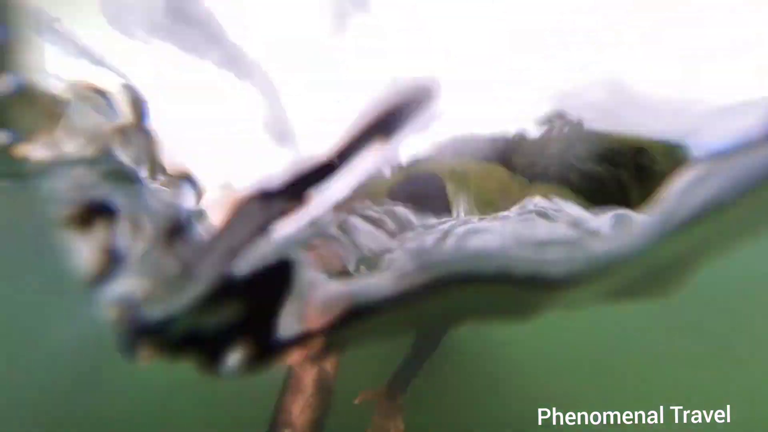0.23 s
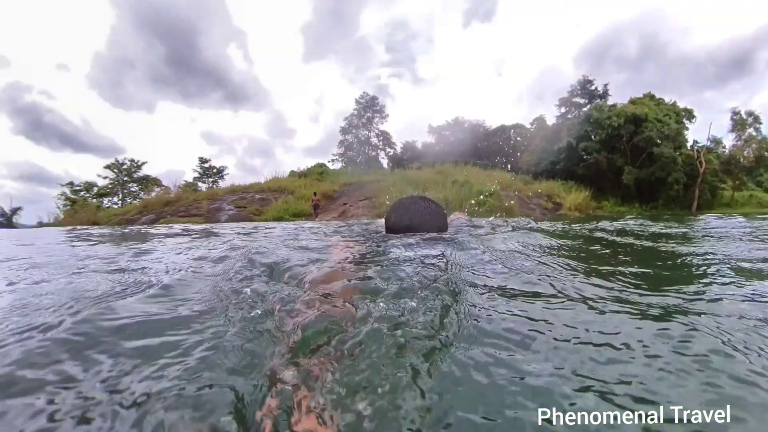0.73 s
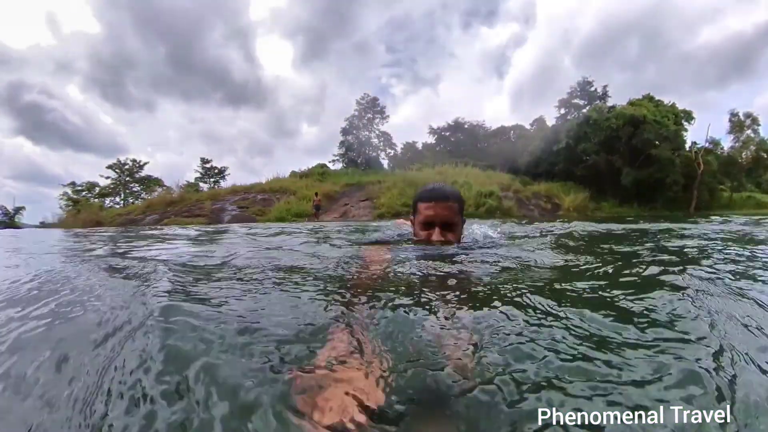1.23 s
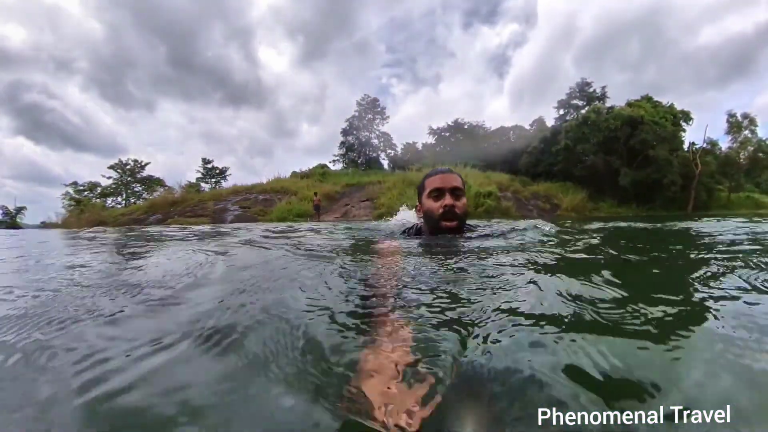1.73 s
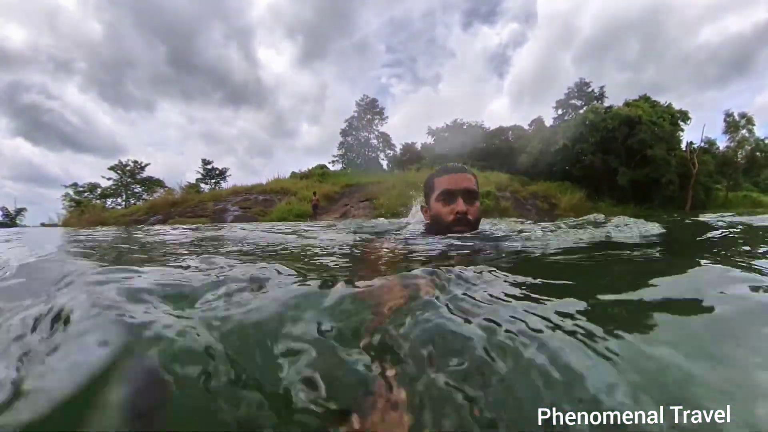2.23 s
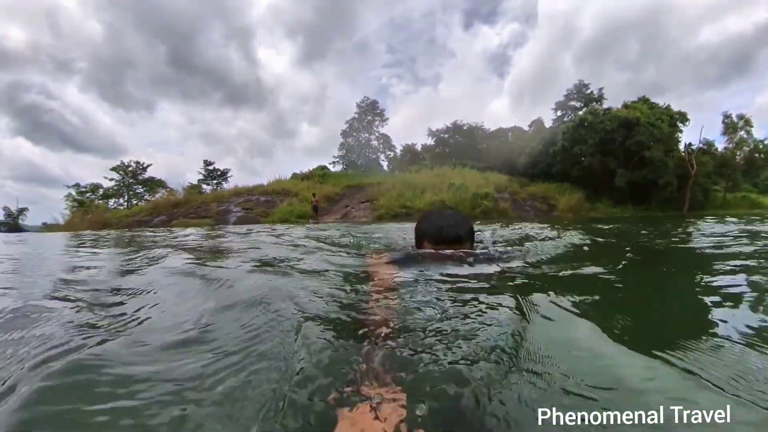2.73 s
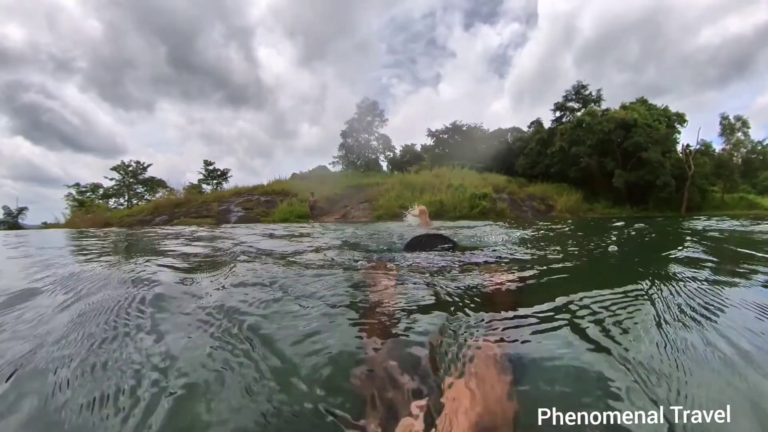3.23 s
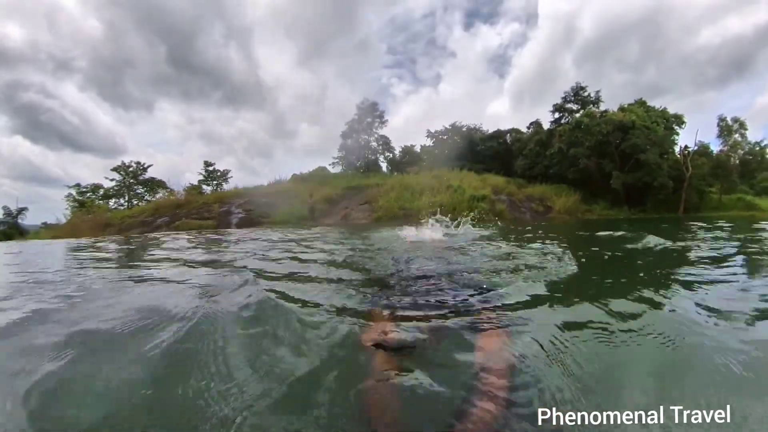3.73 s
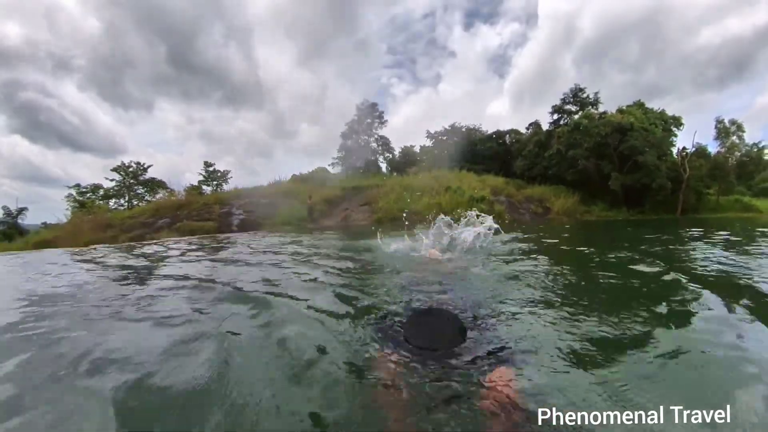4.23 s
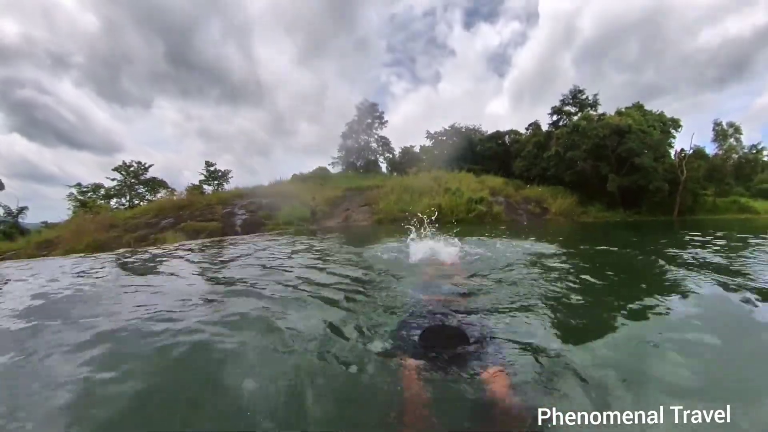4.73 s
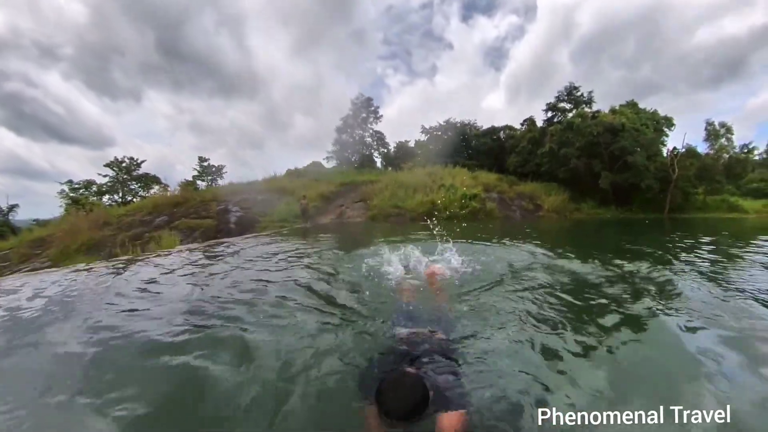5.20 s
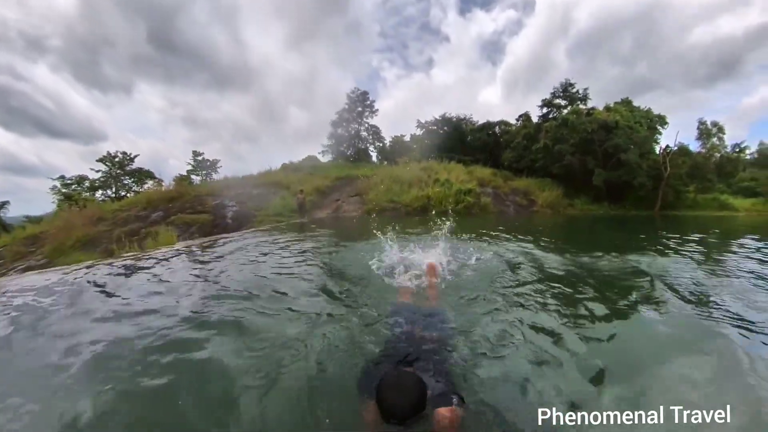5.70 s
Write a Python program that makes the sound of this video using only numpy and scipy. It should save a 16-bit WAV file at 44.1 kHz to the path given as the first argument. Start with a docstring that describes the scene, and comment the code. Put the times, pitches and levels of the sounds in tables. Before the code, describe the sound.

Close, muffled mono sound of paddling in open water, captured inside a waterproof casing. Heavy low knocks come first, then uneven gurgling, rounded plops and short high drips through a calmer middle. A wet sizzle bursts over the microphone at nearly four seconds and snaps loudly. Afterwards deep booming gurgles continue, and the last moments bring rapid lumpy kicks with faint puffs of spray over steady soft hiss.

```python
"""Paddling in a lake, heard from inside a wet housing

A swimmer paddles around a waterproof housing held at the lake surface; everything is muffled.
Air pockets thump and plop as decaying sines; waves and kicks shape noise and bubble swarms into churning.
Drops tick and drip as short high rings, and spray is coloured noise with tiny drips.
Once, random grains fizz through the resonances of the microphone port; a dull noise hiss lies under it all."""
import sys
import numpy as np
from scipy import signal
from scipy.fft import rfft, irfft, next_fast_len
from scipy.io import wavfile
from scipy.ndimage import uniform_filter1d

SR = 44100
rng = np.random.default_rng(int(sys.argv[2]) if len(sys.argv) > 2 else 0)


def digitize_waveform(pressure):
    """Quantize a signal to 16-bit integers and store it at the path in sys.argv[1].

    Rows of a 2-D input are taken as channels; values are limited to [-1, 1].
    """
    field = np.atleast_2d(pressure).T
    bounded = np.clip(field, -1, 1)
    quanta = np.round(bounded * 32767).astype(np.int16)
    wavfile.write(sys.argv[1], SR, quanta)


N = 262836
TIME = np.arange(N) / SR

# Levels in dB are relative within each table; the functions below set the final gains.

# Spectra of the dull hiss and of its upper skirt. Each row: frequency in Hz, relative level in dB.
HISS_SPECTRUM = [(170, -8), (260, -3), (400, -0.5), (560, -4), (720, -7), (950, -6.5), (1200, -5.5),
                 (1600, -6), (1850, -13.5), (2100, -18), (2600, -12.5), (3000, -19.5), (3900, -31)]
SKIRT_SPECTRUM = [(2900, -33), (3200, 3), (3600, -8.5), (4100, -23), (5000, -35)]
HISS_DB, SKIRT_DB, HISS_EDGE_HZ = -35, -76, 2978

# Fine spray over time. Each row: time in seconds, level in dB.
SPRAY_LEVEL = [(0, -90.5), (.85, -90.5), (1.35, -75.5), (1.70, -73), (1.77, -82), (2.15, -70), (3.32, -71),
               (3.4, -86), (3.56, -80), (3.68, -71), (4.08, -76.5), (4.13, -94), (4.85, -91.5),
               (5.04, -77.5), (5.1, -92), (5.42, -89), (5.96, -80.5)]
# Spectra of the fine spray and of the spray from the feet. Each row: frequency in Hz, relative level in dB.
SPRAY_SPECTRUM = [(2500, -7), (3500, -6), (4600, -9), (5400, -7), (6600, -11), (7500, -18.5), (9500, -43.5)]
KICK_SPRAY_SPECTRUM = [(3000, -4.5), (3750, -7), (4150, -6), (4600, 0.5), (5100, -12), (5900, -21),
                       (6600, -14.5), (7300, -34)]
# Spray thrown up by the feet. Each row: start in seconds, length in seconds,
# rise in dB (negative: it sinks), end level in dB.
KICK_SPRAY = [(5.42, .21, 8, -77), (5.645, .21, 0, -70.5), (5.875, .085, -2, -68)]
SPRAY_ATTACK_S, SPRAY_RELEASE_S = 0.035, 0.04

# Dry, even clicks of water knocking on the housing. Each row: start in seconds, level in dB.
KNOCKS = [(0.262, -59), (0.268, -52), (0.271, -59), (0.312, -49), (0.372, -61), (0.512, -53.5),
          (0.542, -62), (2.541, -43), (3.342, -45.5), (4.082, -32), (4.141, -55), (4.392, -61),
          (4.502, -62), (4.642, -53.5), (4.702, -59.5), (5.052, -47)]
KNOCK_HZ, KNOCK_CYCLES = 3900, 2.8
# Drops that spatter on the housing. Each row: start in seconds, level in dB, frequency in Hz.
TICKS = [(0.729, -51.5, 4970), (0.756, -62, 5570), (1.028, -64, 4500), (2.151, -48, 6200),
         (2.168, -44, 4900), (2.194, -39.5, 5260), (2.205, -55, 6600), (2.345, -49.5, 3910),
         (2.503, -50, 4860), (3.283, -48, 4200), (3.909, -41, 4520), (3.931, -31.5, 4400)]
TICK_CYCLES, TICK_RISE_CYCLES = 8.8, 0.8
# A ticking drop breaks into smaller ones; the spread is in log pitch.
SHATTER_S, SHATTER_LOSS_DB, SHATTER_SPREAD = 0.0012, 4, 0.28
# Drops landing in the water. Each row: start in seconds, level in dB, frequency in Hz.
DRIPS = [(0.651, -50, 3630), (0.882, -65, 3570), (0.899, -65, 3700), (0.911, -70, 4050), (0.924, -68, 3850),
         (0.941, -66, 3700), (0.988, -62, 3740), (1.01, -57.5, 3620), (1.036, -66, 4300),
         (1.081, -56, 3740), (1.089, -61, 3950), (1.099, -72, 4150), (1.177, -54, 3740), (1.653, -61, 3900),
         (1.66, -61, 4100), (1.669, -52, 3750), (1.687, -59, 3650), (1.695, -65, 3850),
         (2.124, -43.5, 3800), (2.502, -37.5, 3930), (3.005, -57, 3700), (3.032, -45, 3470),
         (3.061, -58, 3930), (3.285, -45, 3330), (3.415, -60, 4200)]
DRIP_CYCLES = 34
# Each drip throws up two smaller ones; the spread is in log pitch.
REBOUND_S, REBOUND_LOSS_DB, REBOUND_SPREAD = 0.0021, 3.5, 0.23

# Water film on the port. Each row: time in seconds, level in dB, share of the upper resonances (0-1).
FIZZ = [(3.69, -37, 0), (3.728, -35.5, 0), (3.745, -23.5, 0), (3.80, -25, 0.04), (3.862, -22, 0.01),
        (3.868, -31, 0.17), (3.876, -29, 0.9), (3.906, -30.5, 0.95), (3.912, -24.5, 0.2), (3.92, -39, 1),
        (3.935, -56, 1)]
# Lower and upper resonances of the wet port. Each row: frequency in Hz, width in Hz, gain in dB.
PORT_LOW = [(842, 49, 10), (1457, 59, 16.5), (1900, 680, -3)]
PORT_HIGH = [(2480, 380, -5.5), (3270, 270, -19), (4520, 500, -14.5)]
# The film bursting over the port. Each row: start in seconds, level in dB, frequency in Hz, cycles of ringing.
SNAPS = [(3.717, -16, 1500, 16), (3.784, -13.5, 1500, 18), (3.853, -26, 1480, 26), (3.893, -23, 2520, 35),
         (3.911, -14, 2480, 17), (3.926, -8, 2440, 6.5), (3.930, -2.5, 1660, 9), (3.9317, -9, 2520, 7.6),
         (3.931, -8.5, 1000, 5.8)]
SNAP_RISE_CYCLES, SNAP_SLIDE = 0.67, 0.055
FIZZ_GRAIN_DB, FIZZ_GRAINS_PER_S = 2, 9400  # typical spread of grain level, mean rate
FIZZ_PULSE_HZ, FIZZ_PULSE_DB = 54.9, 0.5  # central rate, peak swing

# Big air pockets against the housing. Each row: start in seconds, level in dB, frequency in Hz,
# cycles of ringing, pitch slide as a share over the ring.
THUMPS = [(0.249, -6, 71, 5.8, 0), (0.275, -3.5, 90.5, 6.3, -0.13), (0.326, 11, 72, 1.95, 0.31),
          (0.467, -12, 78.5, 22, 0.081), (0.499, -7.5, 67, 4.8, -0.076), (0.532, -1, 88, 4.2, -0.23),
          (0.552, 5, 91, 3.3, -0.47), (0.599, -9.5, 123, 8.5, -0.15), (1.033, -3.5, 75, 3.8, -0.62),
          (1.258, -13.5, 70, 13, -0.19), (1.375, -10, 163, 8.6, -0.12), (1.447, -7, 74.3, 5.6, -0.18),
          (1.632, -11.5, 52, 8.5, 0), (2.924, -13, 151, 6, -0.089), (2.935, -11.5, 184, 21, -0.47),
          (3.358, -2.5, 125, 12, -0.03), (3.4, -6.5, 155, 12.4, -0.62), (3.44, -19, 125, 10, -0.45),
          (3.725, -10, 166, 12.7, -0.32), (3.931, 3, 153, 3.2, -0.62), (3.949, -12, 120, 1.9, 0),
          (4.101, 6.5, 160, 2.9, -0.11), (4.337, -6, 85, 4.2, 0.34), (4.512, 0.5, 128, 7.8, -.6),
          (4.537, -3.5, 110, 4, -0.55), (4.575, -5.5, 134, 13, -0.82), (4.638, -5.5, 171, 9.4, -.7),
          (4.657, 4.5, 118, 3.8, -.8), (4.942, -9.5, 95, 6, -0.17), (5.07, -3, 90.2, 10.7, -0.0087),
          (5.587, -4.5, 80, 6.7, -0.17), (5.721, 0.5, 58, 2.8, -0.46), (5.788, -12.5, 100, 22, 0.075)]
THUMP_RISE_CYCLES = 0.31
# Water slapping shut, choked at once. Each row: start in seconds, level in dB, frequency in Hz.
SLAPS = [(0.328, -11.5, 392), (0.532, -14.5, 594), (0.555, -16, 396), (0.935, -12, 697), (1.542, -7.5, 450),
         (1.746, -7, 470), (2.254, -9.5, 343), (2.289, -4.5, 590), (2.87, -3.5, 476), (2.892, -7, 188),
         (3.683, -8, 742), (3.929, -13.5, 257), (4.1, -10, 332), (4.404, -11, 332), (4.442, -12.5, 337),
         (4.513, -21, 245), (4.565, -15.5, 327), (4.635, -17, 216), (4.661, -15, 370), (4.72, -15, 444),
         (5.0625, -6, 620), (5.064, -1, 354), (5.415, -11.5, 356), (5.779, -7, 576)]
SLAP_CYCLES = 6.9
# Bubbles that ring at the surface. Each row: start in seconds, level in dB, frequency in Hz,
# cycles of ringing, cycles to swell, pitch slide as a share over the ring.
PLOPS = [(1.027, -8.5, 740, 16, 1.1, 0.037), (1.169, -15.5, 710, 26, 1.7, 0.28),
         (1.352, -12.5, 628, 13, 2.2, 0.38), (1.384, -14.5, 766, 48, 1.7, 0.085),
         (1.44, -11.5, 648, 30, 1.7, -0.15), (1.506, -13, 470, 39, 1.7, -0.25),
         (1.528, -14.5, 420, 21, 1.6, 0.39), (1.612, -17.5, 564, 42, 2, 0.33),
         (1.685, -12, 696, 31, 2.7, -0.071), (1.697, -22, 361, 21, 1.3, 0.59),
         (1.712, -13, 656, 24, 1.5, 0.33), (1.726, -4.5, 265, 13.7, 1.15, 0.76),
         (1.752, -15.5, 584, 48, 2.7, 0.13), (1.845, -15, 738, 36, 1.3, 0.1),
         (1.992, -9, 754, 18, 2, -0.13), (2.018, -12.5, 521, 43, 2.2, -0.51),
         (2.038, -4, 461, 16, 1.55, -0.54), (2.105, -18, 700, 22, 0.7, 0.1),
         (2.172, -11, 747, 40, 1.3, 0.074), (2.218, -10.5, 660, 59, 1.6, 0.12),
         (2.253, -3.5, 707, 21, 0.84, -0.017), (2.322, -20, 765, 36, 1.2, -0.58),
         (2.346, -12, 1200, 24, 1.3, -0.016), (2.47, -7.5, 1127, 85, 3.4, 0.22),
         (2.47, -10.5, 796, 59, 1.2, -0.19), (2.5, -13, 770, 34, 2.2, -0.012),
         (2.5, -23, 1200, 32, 2.6, 0.095), (2.871, -9.5, 291, 17, .6, -0.86),
         (2.882, -12.5, 598, 31, 0.74, -0.12), (3.059, -15, 735, 24, 1, -0.05),
         (3.06, -11, 1370, 14, 1.6, .02), (3.329, -6.5, 780, 9.1, 1.16, -0.035),
         (3.402, -20.5, 820, 59, 1.6, -0.083), (3.67, -6, 803, 18, 1.3, -0.15),
         (3.698, -10.5, 772, 25, 0.73, -0.07), (3.716, -9.5, 810, 28, 0.91, -0.14),
         (3.768, -13, 888, 29, 1.6, -0.28), (3.803, -4, 687, 16.4, 2.4, 0.28),
         (3.831, -5.5, 813, 31, 3.4, -.05), (3.931, -10, 653, 25, 0.24, -0.022),
         (4.05, -9, 213, 24, 1.1, -0.25), (4.07, -13, 885, 22, 2.1, 0.028),
         (4.351, -17.5, 335, 16, 0.89, -0.45), (4.404, -6.5, 688, 72, 1.6, -0.35),
         (4.432, -15.5, 577, 79, 1.8, -0.084), (4.465, -11.5, 615, 32, 1.1, -0.22),
         (4.506, -16.5, 642, 50, 2.1, 0.33), (4.526, -16, 385, 26, 1, -.3),
         (4.721, -8, 283, 9.8, 0.42, 0.25), (4.807, -11, 617, 9.9, .8, 0.13),
         (5.022, -16, 764, 31, 2, 0.0029), (5.044, -4, 750, 16, 1.1, 0.032),
         (5.062, -9.5, 954, 25, 0.74, 0.075), (5.411, -2.5, 576, 7.7, 0.85, -0.015),
         (5.461, -20, 560, 13, 0.83, .02), (5.51, -14, 607, 23, 1.2, -0.37),
         (5.679, -11.5, 347, 17, 1, 0.074), (5.785, -3, 213, 7.4, 0.69, -0.52)]

# Stirring between the waves. Each row: time in seconds, deep level in dB, surface level in dB.
STIR = [(0, -27.5, -41), (0.75, -41, -43), (1.1, -31, -28), (1.65, -36, -28.5), (1.9, -36, -28.5),
        (2.5, -36, -29.5), (2.75, -31, -31.5), (3.3, -34.5, -33), (3.55, -36.5, -38), (3.8, -33.5, -24.5),
        (4.23, -38.5, -54), (4.5, -33, -35), (5.15, -33, -40), (5.3, -27.5, -33), (5.6, -28, -31.5),
        (5.84, -31, -34.5)]
STIR_GURGLE_DB, STIR_SPLASH_DB = -5.5, 2.5
# Each wave washes against the housing, growing, holding or sinking, then breaks off.
# Each row: start in seconds, length in seconds, rise in dB (negative: it sinks),
# end level of surge in dB, end level of gurgle in dB, end level of splash in dB.
WAVES = [(0.196, 0.15, 10.5, -18, -28, -36), (0.462, 0.13, 6, -20.5, -28, -45.5),
         (0.915, 0.016, 8, -39.5, -32.5, -26.5), (0.985, 0.041, 5.5, -27, -31, -30),
         (1.105, 0.08, 0, -36, -32.5, -32.5), (1.24, 0.049, -2.5, -26.5, -32, -26),
         (1.33, 0.11, 3, -26, -26.5, -20), (1.487, 0.17, -5, -32.5, -28.5, -25),
         (1.686, 0.043, 0, -22.5, -19, -20.5), (1.975, 0.14, -2, -33.5, -31, -23),
         (2.14, 0.17, 3.5, -31.5, -33, -18), (2.866, 0.062, -4.5, -26.5, -26.5, -34),
         (3.358, 0.083, -1, -23, -44.5, -37), (3.664, 0.036, 6.5, -24.5, -21.5, -30),
         (3.871, 0.072, 0, -30.5, -24.5, -36), (4.025, 0.047, 9.5, -26, -16, -21),
         (4.314, 0.17, 5.5, -25.5, -24, -26.5), (4.51, 0.21, 1.5, -25.5, -31.5, -52),
         (4.843, 0.21, 5.5, -25, -28.5, -24)]
WAVE_ATTACK_S, WAVE_RELEASE_S = 0.0092, 0.052
# Each kick shoves a short lump of bubbly water. Each row: start in seconds, length in seconds,
# rise in dB (negative: it sinks), end level of surge in dB, end level of gurgle in dB, end level of splash in dB.
KICKS = [(5.361, 0.036, 4, -43, -29, -39), (5.401, .008, 0, -31, -30, -22),
         (5.46, 0.032, 5.5, -35.5, -26, -22.5), (5.521, 0.013, 1.5, -36.5, -25, -23),
         (5.556, 0.036, -0.5, -22, -24.5, -22.5), (5.626, 0.043, 1.5, -33, -25.5, -28),
         (5.668, 0.07, -0.5, -31, -26.5, -24), (5.747, 0.055, 2.5, -25, -20, -24.5),
         (5.885, 0.079, -4, -27, -33.5, -29)]
KICK_ATTACK_S, KICK_RELEASE_S = 0.007, 0.018
# Spectrum of the deep surge. Each row: frequency in Hz, relative level in dB.
SURGE_SPECTRUM = [(15, -9), (30, 6), (60, 4.5), (100, -6), (150, 2.5), (220, -21.5), (400, -67),
                  (1500, -110)]
CLOUD_HZ, CLOUD_WIDTH_HZ = 88, 29  # each of two resonators in series
KICKS_START_S, CLOUD_GROW_S, CLOUD_SHARE_CALM, CLOUD_SHARE_KICKING = 3.93, 0.72, 0.15, 0.72
LUMP_HZ, LUMP_DB = 18, 1.15  # fastest folding, rms swing: water folds over in uneven lumps
CHURN_EDGE_HZ, CUTOFF_HZ = 923, 8700


def from_db(db):
    """Level to amplitude: 20 dB is a factor of ten."""
    return 10 ** (np.asarray(db) / 20)


def rms_one(x):
    """Normalisation to unit root-mean-square amplitude."""
    return x / np.sqrt(np.mean(x ** 2) + 1e-20)


def in_time(rows):
    """Linear interpolation of each column of a curve, sample by sample."""
    s, *columns = np.transpose(rows)
    return [np.interp(TIME, s, c) for c in columns]


def cut(x, hz, kind, order=2):
    """Butterworth filtering: a maximally flat passband."""
    return signal.sosfilt(signal.butter(order, hz, kind, fs=SR, output="sos"), x + 1e-18)


def resonate(x, hz, width_hz):
    """Two-pole resonance: the width sets the damping; the gain on top is 1."""
    r = np.exp(-np.pi * width_hz / SR)
    zeros = np.array([1, 0, -1]) * (1 - r * r) / 2
    poles = [1, -2 * r * np.cos(2 * np.pi * hz / SR), r * r]
    return signal.lfilter(zeros, poles, x + 1e-18)


def noise(spectrum):
    """Spectral shaping of white noise, interpolated over log frequency, to rms 1."""
    hz, db = np.transpose(spectrum)
    size = next_fast_len(N)
    bins = np.maximum(np.fft.rfftfreq(size, 1 / SR), 1)
    gain = from_db(np.interp(np.log(bins), np.log(hz), db))
    return rms_one(irfft(rfft(rng.standard_normal(size)) * gain, size)[:N])


def add(out, s, sound):
    """Superposition: a sound is summed in at its time."""
    at = int(np.clip(s * SR, 0, N - 1))
    out[at:at + len(sound)] += sound[:N - at]


def running_power(x, size):
    """Short-time power: mean square under a sliding triangular window."""
    return uniform_filter1d(uniform_filter1d(x ** 2, size=size), size=size)


def evened(x, size):
    """Level equalisation: division by the running rms."""
    return x / np.sqrt(running_power(x, size=size) + 1e-9)


def bubble(hz, t60, glide, rise_cycles):
    """Damped oscillation: an air pocket swells, rings and dies; its pitch slides as its depth changes."""
    t = np.arange(int(2 * t60 * SR) + 2) / SR
    swell = 1 - np.exp(-(hz * t / rise_cycles) ** 2)
    cycles = hz * (t + glide * t * t / (2 * t60))
    return swell * from_db(-60 * t / t60) * np.sin(2 * np.pi * cycles)


def pockets(table):
    """Superposed single bubbles or drops of alternating polarity, each decaying 60 dB over its ring."""
    out = np.zeros(N)
    for k, (s, db, hz, cycles, rise, glide) in enumerate(table):
        add(out, s, from_db(db) * (-1) ** k * bubble(hz, cycles / hz, glide, rise))
    return out


def ringing(rows, cycles, rise_cycles, glide):
    """Constant damping per cycle: pockets of one kind ring equally many cycles, so big ones last longer."""
    return pockets([(s, db, hz, cycles, rise_cycles, glide) for s, db, hz in rows])


def with_droplets(rows, gap_s, loss_db, spread):
    """Break-up: each drop is followed by two smaller ones at other pitches."""
    out = list(rows)
    for s, db, hz in rows:
        for k, (delay, pitch) in enumerate(2 * rng.random((2, 2)) - 1, 1):
            later = s + gap_s * (k + 0.5 * delay)
            out.append((later, db - loss_db * k, hz * np.exp(spread * pitch)))
    return out


def swarm(low_hz, high_hz, cycles, rise_cycles, glide, count):
    """Incoherent sum of bubbles of random size and pitch, evened in level; the top pitch may move."""
    out = np.zeros(N)
    top_hz = np.broadcast_to(high_hz, N)
    for when, pitch, size, life, sign in rng.random((count, 5)):
        hz = low_hz * (top_hz[int(when * N)] / low_hz) ** pitch
        strength = np.sqrt(-np.log(1 - size)) * np.sign(sign - 0.5)
        t60 = cycles * (0.5 + life) / hz
        add(out, when * N / SR, strength * bubble(hz, t60, glide, rise_cycles))
    return evened(out, size=1500)


def surges_power(rows, attack_s, release_s):
    """Power envelopes that add: each sets in, rises, holds or falls to its end level and breaks off."""
    power = np.zeros(N)
    for start, length, rise_db, end_db in rows:
        age = np.arange(int((attack_s + length + release_s) * SR)) / SR - attack_s
        gate = np.interp(age, [-attack_s, 0, length, length + release_s], [0, 1, 1, 0])
        level_db = end_db - rise_db * np.clip(1 - age / length, 0, 1)
        add(power, start - attack_s, (gate * from_db(level_db)) ** 2)
    return power


def hiss():
    """Band-limited stationary noise: a steady dull hiss with a faint skirt above its steep edge."""
    dull = cut(cut(noise(HISS_SPECTRUM), HISS_EDGE_HZ, "low", order=26), 230, "high")
    return from_db(HISS_DB) * dull + from_db(SKIRT_DB) * noise(SKIRT_SPECTRUM)


def fine_spray():
    """Noise as the limit of many impacts: faint spray that breaks into tiny ringing drips."""
    level_db, = in_time(SPRAY_LEVEL)
    tiny = np.zeros(N)
    for when, pitch, size in rng.random((600, 3)):
        drip = bubble(3250 + 1000 * pitch, t60=0.026, glide=0.054, rise_cycles=2.5)
        add(tiny, when * N / SR, from_db(-16 * size) * drip)
    mixed = from_db(2.5) * noise(SPRAY_SPECTRUM) + from_db(-8.5) * rms_one(tiny)
    return from_db(level_db) * mixed


def kick_spray():
    """Modulated noise: the kicking feet throw up spray that falls back as a narrow hiss in short puffs."""
    power = surges_power(KICK_SPRAY, SPRAY_ATTACK_S, SPRAY_RELEASE_S)
    return np.sqrt(power) * noise(KICK_SPRAY_SPECTRUM)


def drops():
    """Impact and entrainment: water knocks, drops shatter on the housing or trap chirping bubbles."""
    knocks = ringing([(s, db, KNOCK_HZ) for s, db in KNOCKS], KNOCK_CYCLES, rise_cycles=0.33, glide=0)
    shattered = with_droplets(TICKS, SHATTER_S, SHATTER_LOSS_DB, SHATTER_SPREAD)
    ticks = ringing(shattered, TICK_CYCLES, TICK_RISE_CYCLES, glide=0.043)
    rebounding = with_droplets(DRIPS, REBOUND_S, REBOUND_LOSS_DB, REBOUND_SPREAD)
    drips = ringing(rebounding, DRIP_CYCLES, rise_cycles=2.8, glide=0.03)  # chirp upward
    mixed = from_db(18) * knocks + from_db(12.5) * ticks + from_db(11) * drips
    return cut(cut(mixed, 2200, "high"), 9200, "low", order=3)


def port(x, modes):
    """Modal filtering: parallel resonances of the wet port, alternating in polarity, to rms 1."""
    rings = np.zeros(N)
    for k, (hz, width_hz, db) in enumerate(modes):
        rings += from_db(db) * (-1) ** k * resonate(x, hz, width_hz)
    return rms_one(cut(rings, 4570, "low", order=3))


def fizz():
    """Excited resonance: air and water squeeze over the port; its resonance jumps as the film thins and snaps."""
    level_db, thin = in_time(FIZZ)
    thin = np.clip(thin, 0, 1)
    struck = rng.random(N) < FIZZ_GRAINS_PER_S / SR
    grains = struck * from_db(FIZZ_GRAIN_DB * np.minimum(rng.exponential(1, N), 4))
    # air escapes in uneven bursts
    wander = rms_one(cut(rng.standard_normal(N), 30, "low"))
    rate_hz = FIZZ_PULSE_HZ * np.exp(0.42 * wander)
    bursts = from_db(FIZZ_PULSE_DB * np.sin(2 * np.pi * np.cumsum(rate_hz) / SR))
    crackle = grains * rng.choice([-1, 1], N) * bursts
    film = np.sqrt(1 - thin) * port(crackle, PORT_LOW) + np.sqrt(thin) * port(crackle, PORT_HIGH)
    wet = (TIME > FIZZ[0][0]) & (TIME < FIZZ[-1][0])
    snaps = pockets([(*row, SNAP_RISE_CYCLES, SNAP_SLIDE) for row in SNAPS])
    return cut(wet * from_db(level_db) * film + snaps, 5100, "low", order=3)


def air_pockets():
    """Volume resonance of air: thumps, slaps and plops near the housing, attacks muffled by the wet port."""
    thumps = pockets([(*row, THUMP_RISE_CYCLES, slide) for *row, slide in THUMPS])
    slaps = ringing(SLAPS, SLAP_CYCLES, rise_cycles=0.38, glide=0.017)
    plops = pockets(PLOPS)
    mixed = from_db(-2.5) * thumps + from_db(1.0) * slaps + from_db(-1.3) * plops
    return cut(mixed, 2600, "low", order=4)


def flow_db(rest_db, column):
    """Power addition: waves and kicks on top of the stirred water, for one part of its sound."""
    waves, kicks = [
        [(start, length, rise_db, ends_db[column]) for start, length, rise_db, *ends_db in table]
        for table in (WAVES, KICKS)]
    power = from_db(rest_db) ** 2
    power = power + surges_power(waves, WAVE_ATTACK_S, WAVE_RELEASE_S)
    power = power + surges_power(kicks, KICK_ATTACK_S, KICK_RELEASE_S)
    return 10 * np.log10(power)


def between(level_db, pocket_sound, low_hz, high_hz):
    """Energy sharing: the gain falls where the big pockets take up the power in a band."""
    spent = running_power(cut(pocket_sound, [low_hz, high_hz], "band"), size=2400)
    power = from_db(level_db) ** 2
    return power / np.sqrt(power + 5 * spent)


def surge(cloud, level_db, big):
    """Collective oscillation: deep flow noise, and a bubble cloud that pulses as one big bubble."""
    flow = noise(SURGE_SPECTRUM)
    once = resonate(noise(SURGE_SPECTRUM), CLOUD_HZ, CLOUD_WIDTH_HZ)
    boom = rms_one(resonate(once, CLOUD_HZ, CLOUD_WIDTH_HZ))
    mixed = np.sqrt(1 - cloud) * flow + np.sqrt(cloud) * boom
    return evened(mixed, size=2400) * between(level_db, big, 25, 51)


def gurgle(level_db, big):
    """Air entrainment in depth: a swarm of large, low bubbles."""
    bubbles = swarm(179.0, 596, cycles=11, rise_cycles=0.63, glide=0.063, count=1800)
    return bubbles * between(level_db, big, 180, 650)


def splash(cloud, level_db, big):
    """Air entrainment at the surface: a lighter swarm, duller where kicked-in bubbles are larger."""
    top_hz = 900 - 260 * cloud
    bubbles = swarm(556, top_hz, cycles=24.8, rise_cycles=1.1, glide=0.15, count=2000)
    return bubbles * between(level_db, big, 720, 880)


def churn(big):
    """Turbulent mixing: waves push water past the housing and fold in air, as surge, gurgle and splash."""
    deep_db, surface_db = in_time(STIR)
    kicking = np.clip((TIME - KICKS_START_S) / CLOUD_GROW_S, 0, 1)
    cloud = np.clip(CLOUD_SHARE_CALM + (CLOUD_SHARE_KICKING - CLOUD_SHARE_CALM) * kicking, 0, 1)
    deep = surge(cloud, flow_db(deep_db, 0), big)
    low = gurgle(flow_db(surface_db + STIR_GURGLE_DB, 1), big)
    light = splash(cloud, flow_db(surface_db + STIR_SPLASH_DB, 2), big)
    lumps = from_db(LUMP_DB * rms_one(cut(rng.standard_normal(N), LUMP_HZ, "low")))
    folded = cut(from_db(-0.9) * low + from_db(-6.5) * light, CHURN_EDGE_HZ, "low", order=8)
    return from_db(-1.43) * deep + lumps * folded


def scene():
    """Superposition of all the water sounds at the one microphone."""
    big = air_pockets()
    return (hiss() + fine_spray() + kick_spray() + drops() + fizz() + big + churn(big))[None]


def record(dry):
    """Band limitation: the recorder passes neither the deepest swell nor the top."""
    return cut(cut(dry, 9.2, "high"), CUTOFF_HZ, "low", order=12)


dry = scene()
out = record(dry)
digitize_waveform(out)
```